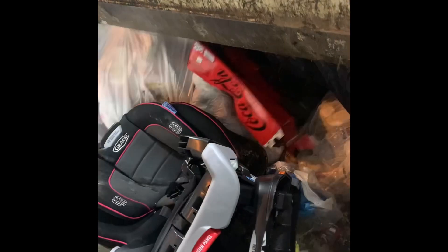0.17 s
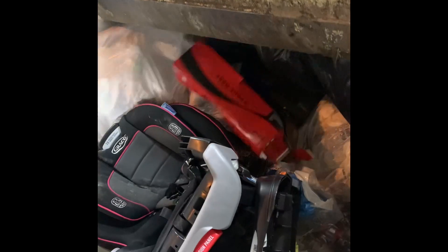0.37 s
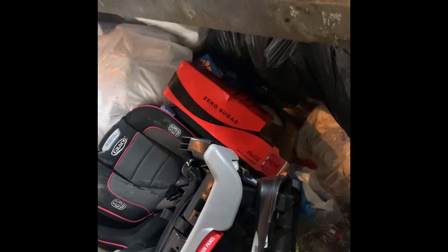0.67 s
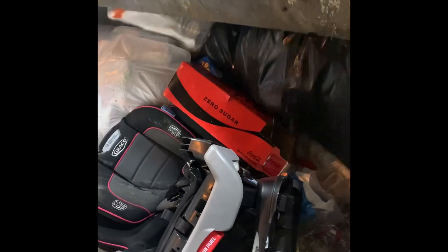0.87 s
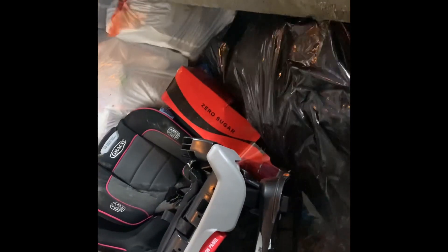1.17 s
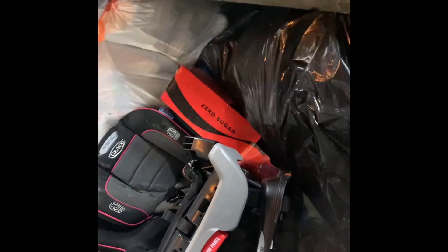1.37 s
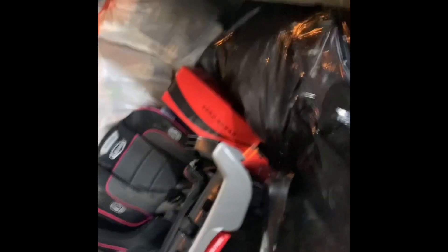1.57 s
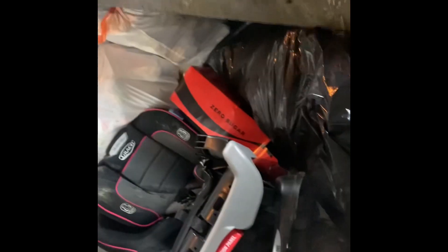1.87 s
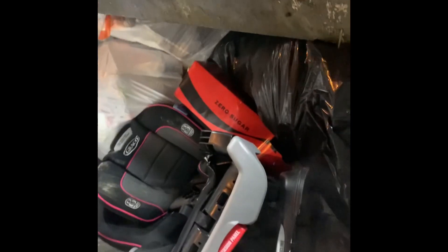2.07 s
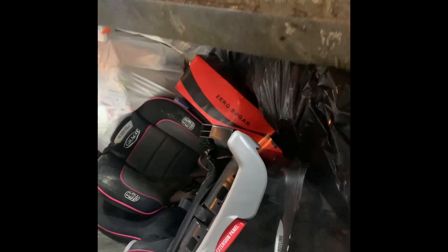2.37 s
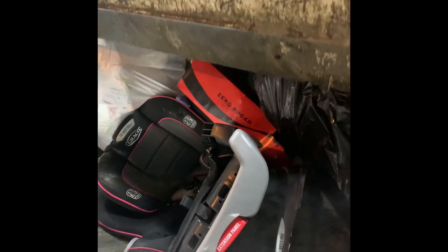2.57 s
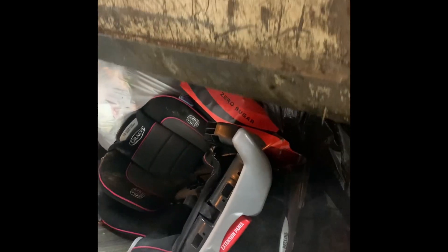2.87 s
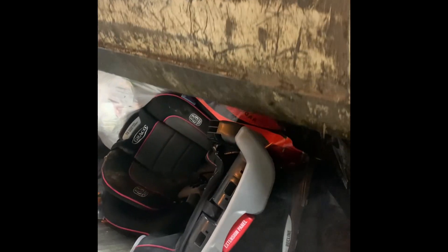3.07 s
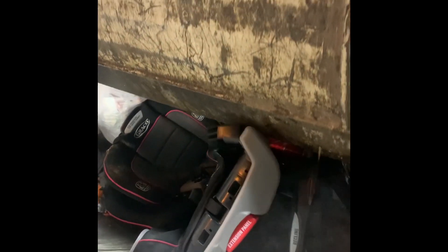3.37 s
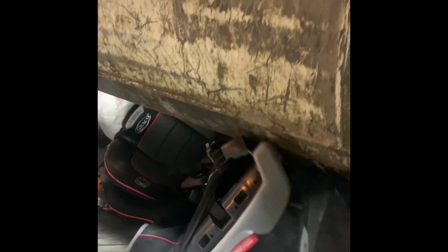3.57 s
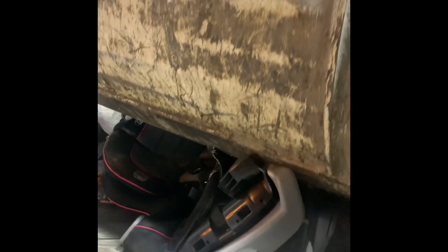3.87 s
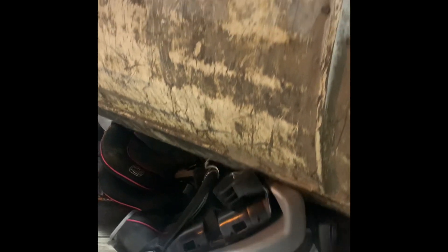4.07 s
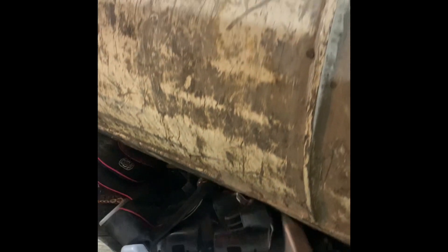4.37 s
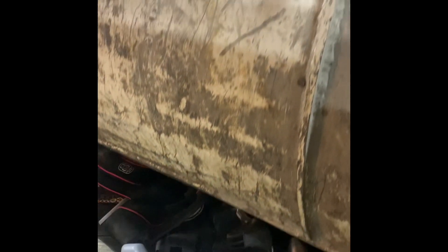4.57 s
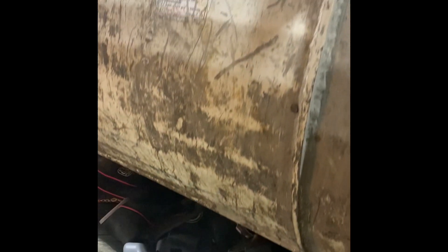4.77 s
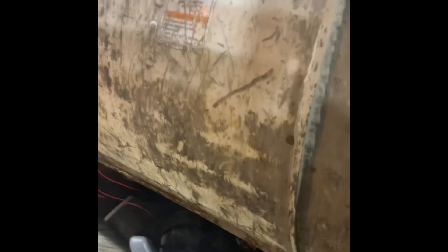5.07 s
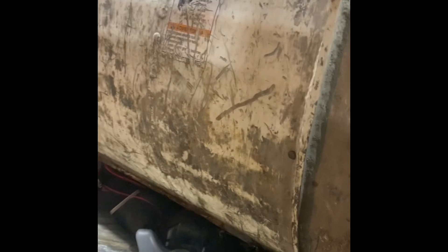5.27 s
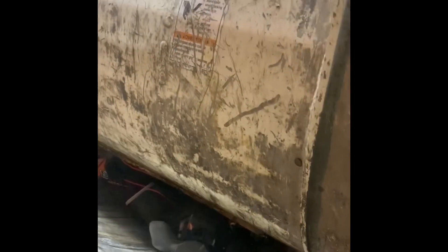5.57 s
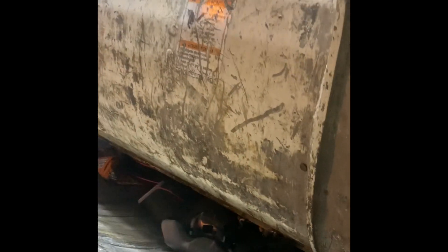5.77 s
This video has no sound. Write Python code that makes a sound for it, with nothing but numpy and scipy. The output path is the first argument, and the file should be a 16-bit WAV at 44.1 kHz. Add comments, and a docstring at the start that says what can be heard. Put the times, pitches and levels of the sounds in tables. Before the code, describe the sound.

A garbage truck's hydraulic pump hums and whines over the engine as its blade presses into the load. Plastic bags rustle and tick, then the heap slumps onto the steel floor with a boom and hollow knocks. Dragged bag plastic squeals faintly, and a hard plastic seat breaks in a run of loud, sharp cracks before the hum fades. It is heard close to the open hopper.

```python
"""A refuse truck's hydraulic blade sweeps down over bags and a moulded plastic seat, heard close by.
From the start the pump hums over the engine; the load thumps, cracks and scrapes, film rustles and ticks.
At 1.5 s the heap slumps on the steel floor with hollow knocks, and the truck body shudders.
At 2.8 s dragged film squeals. From 3.5 s the seat's plastic gives way in a run of sharp cracks,
creaking just before the snap at 5.27 s; the hum fades near the end."""
import sys
import numpy as np
from scipy import signal
from scipy.fft import rfft, irfft, next_fast_len
from scipy.io import wavfile
from scipy.ndimage import uniform_filter1d, minimum_filter1d

SR = 44100
rng = np.random.default_rng(int(sys.argv[2]) if len(sys.argv) > 2 else 0)


def store_pcm(level_fs):
    """Save levels as 16-bit WAV."""
    pcm = np.round(np.clip(level_fs, -1, 1) * 32767).astype(np.int16)
    wavfile.write(sys.argv[1], SR, np.atleast_2d(pcm).T)


N = 261072


def amp(db):
    return 10 ** (np.asarray(db, float) / 20)


def decay(t, t60_s):
    return amp(-60 * t / t60_s)


def rms_one(x):
    return x / np.sqrt(np.mean(x ** 2) + 1e-20)


def peak_one(x):
    return x / np.abs(x).max()


def add(track, start_s, sound):
    at = round(start_s * SR)
    track[at:at + len(sound)] += sound[:N - at]


def in_time(rows):
    """Columns of a curve table at every sample."""
    times_s, *columns = np.transpose(rows)
    return [np.interp(np.arange(N) / SR, times_s, column) for column in columns]


def at_hz(points, hz):
    """A spectrum read on a log-frequency axis."""
    points_hz, points_db = np.transpose(points)
    return np.interp(np.log(hz + 1), np.log(points_hz), points_db)


def drift(rate_hz):
    """Slow random wander, rms 1."""
    step = 40
    pole = np.exp(-2 * np.pi * rate_hz * step / SR)
    slow = signal.lfilter([1], [1, -2 * pole, pole * pole], rng.standard_normal(N // step + 2002))[2000:]
    return np.interp(np.arange(N) / step, np.arange(len(slow)), rms_one(slow))


def colour(x, spectrum):
    """Give a flat sound a spectrum; rms 1."""
    gain = amp(at_hz(spectrum, np.fft.rfftfreq(N, 1 / SR)))
    return rms_one(irfft(rfft(x) * gain, N))


def resonance(x, hz, width_hz):
    """Band-pass, peak gain 1."""
    r = np.exp(-np.pi * width_hz / SR)
    poles = [1, -2 * r * np.cos(2 * np.pi * hz / SR), r * r]
    return signal.lfilter((1 - r * r) / 2 * np.array([1, 0, -1]), poles, x)


def bands(x, modes, spread_db=0):
    """Resonances in parallel, signs alternating."""
    return sum((-1) ** k * amp(db + spread_db * rng.standard_normal()) * resonance(x, hz, width_hz)
               for k, (hz, width_hz, db) in enumerate(modes))


def grains(per_s, spread_db, smooth):
    """Random clicks of uneven size on a bed of smooth noise."""
    sizes = amp(spread_db * np.minimum(rng.exponential(1, N), 4)) * rng.standard_normal(N)
    clicks = sizes * (rng.random(N) < per_s / SR)
    return rms_one(clicks) + smooth * rng.standard_normal(N)


# Pump fundamental. Each row: time in seconds, piston rate in Hz, level in dB.
PUMP_HUM = [(0.0, 178.9, -22), (0.46, 178.4, -23), (0.61, 178.4, -19), (0.94, 179.7, -20),
            (1.1, 180.1, -29.5), (1.19, 180.2, -17.5), (1.53, 179.7, -8), (1.72, 179.3, -11.5),
            (1.82, 164.9, -18.5), (1.93, 166.6, -11.5), (2.18, 161.6, -9), (2.32, 161.3, -12),
            (2.48, 164.4, -10), (2.56, 163.5, -16.5), (2.67, 169.6, -10), (2.93, 179.1, -8),
            (3.08, 185.5, -14.5), (3.2, 184.5, -21.5), (3.37, 190, -23.5), (3.71, 188.4, -15),
            (3.85, 188.6, -19), (4.09, 183.3, -12.5), (4.2, 182.4, -16), (4.44, 179.5, -18.5),
            (4.55, 181.4, -25.5), (4.68, 178.8, -17), (4.81, 180, -15.5), (5.24, 177.3, -17.5),
            (5.42, 179, -23.5), (5.66, 183.3, -25.5), (5.72, 185.8, -34), (5.92, 185.8, -45)]
# Brief cancellations of the hum. Each row: centre in seconds, depth in dB, half width in seconds.
HUM_DIPS = [(1.116, -46, 0.014), (1.579, -32, 0.029), (1.662, -7, 0.012), (1.986, -30, 0.058),
            (2.589, -40, 0.05), (2.828, -19, 0.075), (3.08, -25, 0.03), (3.934, -59, 0.17),
            (5.163, -27, 0.097), (5.7, -8, 0.013)]
# Pump overtones. Each row: time in seconds, second harmonic in dB, whine in dB.
PUMP_OVERTONES = [(0, -44, -36.5), (.45, -37.5, -36), (.6, -38, -36), (.8, -37, -38.5), (1.0, -44, -37.5),
                  (1.2, -47.5, -38), (1.5, -43, -47), (1.9, -48, -46), (2.0, -38, -45), (2.08, -39, -42),
                  (2.13, -40, -45), (2.3, -28.5, -42), (2.45, -39, -44), (2.65, -36, -39.5),
                  (2.8, -52, -39), (3.0, -39, -44.5), (3.07, -45, -38.5), (3.15, -38, -43),
                  (3.4, -47, -43.5), (4.1, -39.5, -41.5), (4.3, -87, -78), (4.75, -35, -69),
                  (5.92, -49.5, -57)]
# Whine partials. Each row: multiple of the piston rate, level in dB re the whine.
WHINE_ORDERS = [(3, -4), (4, -11.5), (5, -18.5), (6, -15.5), (7, -12.5), (8, -19), (9, -14), (10, -18.5),
                (11, -21.5), (13, -25)]


def pump():
    """Piston pulses heard as a near sine with weak overtones."""
    piston_hz, hum_db = in_time(PUMP_HUM)
    second_db, whine_db = in_time(PUMP_OVERTONES)
    hum_gain = amp(hum_db + 1.02 * drift(9.4))
    for centre_s, depth_db, half_width_s in HUM_DIPS:
        away = ((np.arange(N) / SR - centre_s) / half_width_s) ** 2
        hum_gain *= np.sqrt((amp(2 * depth_db) + away) / (1 + away))
    phase = 2 * np.pi * np.cumsum(piston_hz) / SR
    whine = sum(amp(db + 1.1 * drift(24)) * np.sin(order * phase) for order, db in WHINE_ORDERS)
    second = amp(second_db + 3 * drift(14)) * np.sin(2 * phase)
    return np.sqrt(2) * (hum_gain * np.sin(phase) + second + amp(whine_db) * whine)


# Engine and truck body. Each row: time in seconds, rumble in dB, roar in dB.
ENGINE_LEVELS = [(0.0, -39, -24), (0.13, -35, -29.5), (0.45, -35, -33), (0.7, -35.5, -41.5),
                 (0.87, -34, -31.5), (1.14, -34, -33.5), (1.35, -29, -28), (1.48, -28, -32),
                 (1.92, -22, -31.5), (2.07, -33, -37), (3.0, -31, -38), (3.4, -32, -36), (3.66, -31, -41),
                 (4.05, -35, -34), (4.2, -55, -48), (4.45, -51, -74), (4.8, -40, -29), (5.13, -36, -28.5),
                 (5.3, -37, -37), (5.92, -47.5, -37)]
# Their spectra. Each row: frequency in Hz, relative density in dB.
RUMBLE_SPECTRUM = [(20, -36), (35, -4), (52, 2.5), (70, 11), (92, 9.5), (125, 8.5), (220, 5.5), (300, -60),
                   (1500, -68)]
ROAR_SPECTRUM = [(150, -4), (230, 4), (270, -1), (390, -1), (520, -3), (700, -16.5), (900, -17),
                 (1500, -11.5), (6000, -64)]


def engine():
    """Lumpy low noise through the body and a dull roar above the hum."""
    rumble_db, roar_db = in_time(ENGINE_LEVELS)
    rumble = amp(rumble_db + 2 * drift(28)) * colour(rng.standard_normal(N), RUMBLE_SPECTRUM)
    roar = amp(roar_db + 2.24 * drift(33)) * colour(rng.standard_normal(N), ROAR_SPECTRUM)
    return rumble + roar


# Load under the blade. Each row: time in seconds, scrape in dB, film rustle in dB, hiss in dB.
LOAD_LEVELS = [(0.0, -36.5, -33.5, -37), (0.35, -43, -41, -42.5), (0.7, -42.5, -40, -49.5),
               (0.86, -54, -38.5, -41), (1.25, -47, -41, -50.5), (1.5, -47, -38, -43.5),
               (1.72, -70, -39.5, -51), (2.0, -48.5, -47, -53.5), (2.58, -42, -45.5, -50),
               (2.74, -46, -48, -59), (2.784, -42, -33.5, -36), (2.87, -48, -36.5, -40),
               (3.36, -39.5, -33.5, -37), (3.43, -42, -35.5, -41.5), (3.51, -28.5, -26, -32.5),
               (3.65, -27.5, -23, -29.5), (3.82, -29.5, -25.5, -31), (3.88, -30.5, -29, -32.5),
               (4.07, -32.5, -33.5, -35.5), (4.22, -38.5, -40.5, -45.5), (4.66, -48.5, -43.5, -46.5),
               (4.81, -38, -30.5, -41), (5.0, -33.5, -40.5, -48), (5.36, -61, -48, -60),
               (5.5, -50, -45, -51.5), (5.92, -48, -43.5, -51)]
# Bags shifting. Each row: peak time in seconds, scrape, film and hiss in dB, fade constant in seconds.
BAG_SHIFTS = [(0.005, -62, -55, -31, 0.0052), (0.13, -42, -38, -41, 0.014), (0.22, -36, -35, -46, 0.022),
              (0.275, -36, -57, -40, 0.012), (0.315, -56, -58, -44, 0.0074),
              (0.424, -46, -26.5, -29.5, 0.026), (0.495, -43, -40, -45, 0.12), (0.745, -64, -48, -41, 0.11),
              (0.858, -49, -34, -37, 0.011), (1.03, -44, -45, -43, 0.1), (1.295, -41, -34.5, -38, 0.025),
              (1.425, -39, -37, -29, 0.0063), (1.534, -39, -26, -31, 0.026), (1.565, -29, -26, -50, 0.012),
              (1.602, -23, -24, -25, 0.014), (1.665, -24, -64, -74, 0.018), (1.805, -35, -52, -50, 0.025),
              (3.647, -24, -29, -39, 0.0057), (4.387, -45, -45, -42, 0.011), (4.716, -61, -52, -47, 0.024),
              (5.166, -50, -64, -61, 0.0049), (5.25, -33.5, -31.5, -35, .015),
              (5.395, -36, -70, -71, 0.029)]
# Spectra of the three layers. Each row: frequency in Hz, relative density in dB.
SCRAPE_SPECTRUM = [(500, -0.5), (900, -6.5), (1300, 0), (1800, 4), (2300, -1), (3000, -9.5), (4500, -16),
                   (12000, -63)]
FILM_SPECTRUM = [(1800, -7.5), (3000, 1), (4200, 0.5), (5200, -0.5), (6200, -0.5), (7500, -5), (8500, -12),
                 (10000, -41), (13000, -33), (17000, -58)]
HISS_SPECTRUM = [(5000, -13.5), (8000, 1.5), (10000, 12), (12000, 9), (14000, 8), (16000, -1.5)]


def sliding_load(shift_rise_s=0.015):
    """Dense grains of sliding rubbish; one unevenness shakes scrape, film and hiss together."""
    t = np.arange(N) / SR
    gains = amp(in_time(LOAD_LEVELS))
    for peak_s, *peak_db, fade_s in BAG_SHIFTS:
        envelope = np.exp(-abs(t - peak_s) / np.where(t < peak_s, shift_rise_s, fade_s))
        gains += amp(peak_db)[:, None] * envelope
    scrape_gain, film_gain, hiss_gain = gains
    uneven = drift(9.2)
    crinkle = grains(per_s=3000, spread_db=2.9, smooth=1.57)
    grit = grains(per_s=1500, spread_db=2.23, smooth=0.73)
    scrape = scrape_gain * amp(uneven) * colour(grit, SCRAPE_SPECTRUM)
    film = film_gain * amp(2.5 * uneven) * colour(crinkle, FILM_SPECTRUM)
    hiss = hiss_gain * amp(0.38 * uneven) * colour(crinkle, HISS_SPECTRUM)
    return scrape + film + hiss


def ring(push, modes, near_hz, spread_db):
    """A push rings every mode, favouring those near near_hz; each piece is slightly detuned. Peak 1."""
    out = 0
    for (hz, db, t60_s), (level_draw, tuning_draw) in zip(modes, rng.standard_normal((len(modes), 2))):
        r = decay(1 / SR, t60_s)
        angle = 2 * np.pi * hz * (1 + .02 * tuning_draw) / SR
        db += spread_db * level_draw - 11 * abs(np.log2(hz / near_hz))
        out = out + amp(db) * signal.lfilter([0, np.sin(angle)], [1, -2 * r * np.cos(angle), r * r], push)
    return peak_one(out)


# Plastic cracks and dull thumps in the load. Each row: start and length in seconds, snap peak in dB,
# tilt in dB per octave, fine treble, mid ring, low ring and floor thud in dB re the snap, pitch in Hz.
CRACKS_AND_THUMPS = [(0.06, 0.0074, -31, -3, -10, 9, 13, 20.5, 1460),
                     (0.074, 0.0038, -34, 0.1, -6, -8, 3, 19.5, 1010),
                     (0.2, 0.0032, -35, -9, -4, 13, 0, -21, 1480),
                     (0.226, 0.0095, -25.5, -4, -10, 8.5, 1, -15, 1820),
                     (0.2377, .003, -26, -6, -13, -10, 0, -21, 1620),
                     (0.409, 0.0081, -26, 9, -5, 8, 8.5, -17, 1236),
                     (0.436, 0.0049, -23, 2, -15, 7, 5, -17, 1130),
                     (0.467, 0.0034, -34, 0, -13, 10, -1, -24, 1080),
                     (0.942, .003, -48, 3, -11, -2, 24, -4, 1000),
                     (1.527, 0.0062, -17.5, -4, -12, 5.5, -7, -12, 1420),
                     (1.538, 0.01, -26.5, -4, -15, 21.5, 21.5, 5, 744),
                     (1.66, 0.017, -20, -23, -23, -7, 9, -11, 1500),
                     (3.4934, 0.003, -20, 2, -2, 2, -11, -8, 1233),
                     (3.5406, 0.0018, -6, 6, -15, -32, -19, -7.5, 1912),
                     (3.612, 0.0038, -15, -6, -4, -10, -13, -25, 2137),
                     (3.6435, 0.0063, -14, -6, 1, 3.5, 3.5, -22, 1090),
                     (3.679, 0.0018, -5, 3, -5.5, -8, -14, -12, 1350),
                     (3.758, 0.0031, -18, 18, -10, -15, 0, -7, 1502),
                     (3.7999, 0.0044, -7, 3, -4, -26, -12, -13, 2682),
                     (3.912, 0.0032, -18, 0.1, 5, -17, -24, -14, 1440),
                     (3.9832, 0.0044, -24.5, 7, 14, -18, -19, -19, 1830),
                     (4.051, 0.0024, -24, -7, -12, 4, -2, -15, 1163),
                     (4.0879, 0.0095, -12, -7, -13, -3, -27, -29, 2520),
                     (4.096, 0.0079, 7, -15, -6, -18, -26, -9.5, 2300),
                     (4.1215, 0.0018, -14.5, -2, -17, 11, 4, -28, 1685),
                     (4.138, 0.0022, 2, -4, -11, -5.5, -11.5, -37, 2140),
                     (4.2657, 0.0022, 1, -0.5, -22, -7.5, -11.5, -39, 1119),
                     (4.332, 0.004, -32, -2, -8, 13, -8, -14, 1440),
                     (4.3622, .002, -20, -5, -16, -4, -21, -24, 1603),
                     (4.3855, .007, -11.5, 0.5, -7.5, -3.5, -9, -34, 1363),
                     (4.446, 0.0037, -25, -3, -13, -19, -6, -39, 1704),
                     (4.449, 0.0058, 6.5, 0, -24, -11.5, -9, -45, 1514),
                     (4.5328, 0.0034, -27, -4, -2, 8.5, 9.5, -30, 1360),
                     (4.6689, 0.0016, -16.5, -8, -9, -15, -12, -28, 2296),
                     (4.7117, 0.0021, -16.5, -1, -21, -3, -2, -34, 1238),
                     (4.728, .0015, -31, 4, 12, -20, -10, -15, 1303),
                     (4.778, 0.0025, -18, -14, 2, -8, -7, -20, 914),
                     (4.8222, 0.0047, 2, -6, -7.5, -1.5, -0.5, -34, 1590),
                     (4.9432, 0.0021, 6.5, 0, -13, -4, -12, -42, 1155),
                     (5.0463, 0.0052, -1, -6, -6, -6.5, -5, -42, 2494),
                     (5.0642, 0.0026, -5.5, 2, -7, -7, -14, -33, 1458),
                     (5.0724, 0.0033, -3.5, -5, -7, -9, -2.5, -19, 1263),
                     (5.0854, .004, -7, -7, -15, -9, -11, -21, 1333),
                     (5.1086, 0.0034, -31, -2, -26, 12, 2, -17, 1059),
                     (5.1563, 0.0048, -14.5, -5, -13, -10.5, -25, -6, 1110),
                     (5.2723, 0.0038, -2, 4, -13, -9.5, -27, -45, 2777),
                     (5.396, 0.0037, -37.5, -5, -18, -4, 21, 21, 1467),
                     (5.4181, 0.0042, -5.5, -11.5, -5.5, -9.5, -4.5, -22, 1082),
                     (5.5643, 0.0059, -30, -6, -8, -25, 6.5, -18, 929)]
# Snap and its fine treble. Each row: centre in Hz, width in Hz, relative gain in dB.
SNAP_BANDS = [(2280, 890, -3.5), (4120, 560, 4), (5160, 3750, 6), (6140, 3140, 8), (7280, 1830, -2.5),
              (8130, 3150, -6.5)]
FINE_BANDS = [(7550, 2000, -23), (10700, 7300, 41), (13600, 2700, -24)]
# Modes of the shell and hopper floor. Each row: frequency in Hz, relative gain in dB, t60 in seconds.
SHELL_MID_MODES = [(930, -3, .03), (1100, -1, .035), (1320, -2, .025), (1550, 0, .03), (1850, -3, .02),
                   (2200, -3, .018), (2450, -3, .018), (2750, -2, .018)]
SHELL_LOW_MODES = [(325, 8.5, 0.078), (405, 11, 0.027), (448, 8.5, 0.034), (510, 11, 0.016),
                   (659, 4.5, 0.057), (760, -14, 0.019)]
FLOOR_MODES = [(60, -23, 0.039), (106, 18.5, 0.012), (214.5, 5.5, 0.13)]


def cracks_and_thumps(build_db=-18.5, build_s=0.0088, push_rise_s=0.0012, piece_db=-2, piece_cycles=24):
    """A soft creak, a bright snap, then plastic and floor ring; where the lows lead it is a dull thump."""
    out = np.zeros(N)
    t = np.arange(6000) / SR - .02  # onset at t = 0
    since_s = np.maximum(t, 0)
    build = np.where(t < 0, amp(build_db) * np.exp(np.minimum(t, 0) / build_s), 1)
    bite = 1 + (t >= 0) * amp(-29) * decay(since_s, 0.0045)  # the first instant is hardest
    swell = build * np.where(t < 0, 1, 1 - (1 - amp(build_db)) * np.exp(-since_s / push_rise_s))
    for start_s, length_s, *levels_db, piece_hz in CRACKS_AND_THUMPS:
        snap_db, tilt_db, fine_db, mid_db, low_db, thud_db = levels_db
        after_s = np.maximum(t - length_s, 0)
        tail = decay(after_s, 0.14)
        snap_noise, mid_noise, low_noise, thud_noise, size_noise = rng.standard_normal((5, len(t)))
        fragment_sizes = amp(17.5 * uniform_filter1d(size_noise, size=25))
        snap_envelope = build * bite * (decay(after_s, 0.017) + amp(-10) * tail)
        splinters = snap_noise * fragment_sizes * snap_envelope
        push = swell * (decay(after_s, 0.026) + amp(-5.5) * tail)  # drives the lows longer than the snap
        tilted = [(hz, width_hz, db + tilt_db * np.log2(hz / 4500)) for hz, width_hz, db in SNAP_BANDS]
        piece_mode = (piece_hz, piece_db, piece_cycles / piece_hz)
        snap = peak_one(bands(splinters, tilted, spread_db=1.5))
        fine = amp(fine_db) * peak_one(bands(splinters, FINE_BANDS))
        mid = amp(mid_db) * ring(mid_noise * push, SHELL_MID_MODES + [piece_mode], piece_hz, spread_db=3.5)
        low = amp(low_db) * ring(low_noise * push, SHELL_LOW_MODES, near_hz=480, spread_db=3)
        thud = amp(thud_db) * ring(thud_noise * push, FLOOR_MODES, near_hz=103, spread_db=-4)
        add(out, start_s + t[0], amp(snap_db) * (snap + fine + mid + low + thud))
    return out


def treble(x):
    return signal.sosfilt(signal.butter(1, [3000, 13000], "band", fs=SR, output="sos"), x)


# Stretched bag film. Each row: start in seconds, peak in dB.
FILM_TICKS = [(0.0877, -9.5), (0.5427, -9), (1.284, -30), (1.3922, -11.5), (1.413, -18), (1.4196, -9),
              (1.7365, -26), (1.778, -19), (1.8075, -16), (1.8095, -16), (1.813, -19), (1.842, -22.5),
              (1.8772, -17), (1.894, -30), (1.9205, -29), (1.952, -22.5), (2.0165, -19), (2.025, -24),
              (2.031, -30), (2.0514, -24), (2.071, -39), (2.083, -28.5), (2.1686, -30), (2.189, -20.5),
              (2.237, -26), (2.254, -22), (2.272, -25), (2.2897, -20), (2.322, -26), (2.353, -21),
              (2.418, -24), (2.443, -34), (2.451, -22.5), (2.486, -22), (2.5378, -25.5), (2.567, -9.5),
              (2.667, -30), (3.328, -15.5), (4.914, -15), (5.372, -30), (5.717, -24), (5.8272, -32),
              (5.875, -34)]


def film_ticks():
    """One sharp click and a very short burst each; thin film radiates only treble."""
    out, t = np.zeros(N), np.arange(1500) / SR
    click = 2.0 * (t == 0)
    envelope = decay(t, 0.007) + amp(-16.5) * decay(t, 0.058)
    for start_s, peak_db in FILM_TICKS:
        burst = (click + rng.standard_normal(len(t))) * envelope
        add(out, start_s, amp(peak_db) * peak_one(treble(burst)))
    return out


# Heap slumping on the steel floor. Each row: time in seconds, boom in dB, crunch in dB.
SLUMP_LEVELS = [(1.49, -65, -47), (1.53, -27, -12), (1.542, -15, -4.5), (1.58, -4, -6.5), (1.62, -16, -16),
                (1.65, -13.5, -21), (1.7, -16.5, -31), (1.76, -52, -30), (1.85, -60, -42.5)]
# Broad floor resonances. Each row: centre in Hz, width in Hz, relative gain in dB.
BOOM_BANDS = [(55, 19, 1.5), (83, 31, 4), (138, 108, -1.5), (177, 63, -1.5)]
CRUNCH_BANDS = [(267, 28, -4), (290, 110, -9.5), (377, 39.6, -2.5), (472, 54, -5.5), (710, 112, -13.5),
                (1223, 230, -21.5), (1800, 400, -30.5)]


def slump(shudder_peak_s=1.7, rise_db_per_s=92, fall_db_per_s=11):
    """Coarse grains drive the hopper floor in a heavy crunch, then the body shudders."""
    boom_db, crunch_db = in_time(SLUMP_LEVELS)
    lumps = grains(per_s=500, spread_db=3, smooth=1.5)
    late_s = np.arange(N) / SR - shudder_peak_s
    shudder_db = -25 + np.minimum(rise_db_per_s * late_s, -fall_db_per_s * late_s)
    shudder = amp(shudder_db) * rms_one(resonance(rng.standard_normal(N), hz=53, width_hz=5.5))
    boom = amp(boom_db) * rms_one(bands(lumps, BOOM_BANDS))
    crunch = amp(crunch_db) * rms_one(bands(lumps, CRUNCH_BANDS))
    return boom + crunch + shudder


# Knocks of shell and heap. Each row: start in seconds, pitch in Hz, peak in dB, t60 in seconds.
HOLLOW_KNOCKS = [(1.528, 383, -7, .06), (1.541, 431, -2, 0.065), (1.5405, 764, -6, .03),
                 (1.562, 730, -12, .05), (1.577, 594, -15, .04), (1.552, 140, -9.5, 0.087),
                 (1.556, 328, -14, .06), (1.576, 410, -10, 0.08), (1.581, 105, -11, 0.1),
                 (1.591, 378, -10.5, .08), (1.6, 207, -10, 0.089), (1.614, 426, -17, 0.087),
                 (1.633, 334, -13, 0.16), (1.642, 137, -3.5, 0.058), (1.65, 520, -17, .06),
                 (1.665, 319, -13, 0.11), (1.672, 167, -17, .08), (1.691, 208, -8, .06),
                 (1.726, 390, -28, 0.084), (1.765, 338, -19.5, 0.11), (3.104, 379, -22.5, 0.22),
                 (3.648, 1100, -17, .04), (4.268, 1155, -19, 0.037), (4.332, 1890, -21, .015),
                 (4.826, 1547, -6.5, 0.1), (4.947, 1158, -11, 0.11), (5.047, 428.6, -17, 0.0507),
                 (5.068, 308, -7.5, 0.033), (5.074, 402, -15, 0.05), (5.086, 395, -13, 0.073),
                 (5.163, 1113, -30, .09), (5.423, 1100, -18, 0.063), (5.419, 636, -13, 0.034),
                 (5.561, 402, -19.5, .05)]


def hollow_knocks(rise_cycles=1.3):
    """A soft blow rings one hollow resonance and a close, rough neighbour."""
    out, t = np.zeros(N), np.arange(9000) / SR
    for start_s, hz, peak_db, t60_s in HOLLOW_KNOCKS:
        phase = 2 * np.pi * hz * t
        tone = np.sin(phase) + .4 * np.sin(1.17 * phase + rng.uniform(0, 2 * np.pi))
        envelope = (1 - np.exp(-t * hz / rise_cycles)) * decay(t, t60_s)
        add(out, start_s, amp(peak_db) * peak_one(tone * envelope))
    return out


# Film dragged on steel. Each row: time in seconds, level of the rings in dB.
DRAG_LEVELS = [(2.74, -97), (2.8, -42.5), (3.1, -40), (3.45, -40.5), (3.7, -66), (3.8, -95)]
# Its rings. Each row: centre in Hz, width in Hz, relative level in dB.
DRAG_BANDS = [(1540, 240, -1), (2020, 90, -7), (3310, 130, -2), (3930, 110, -2), (4450, 200, -4),
              (5700, 200, -3), (6300, 150, -3), (7010, 200, -8)]
# Its whistle. Each row: time in seconds, pitch in Hz, level in dB.
DRAG_WHISTLE = [(2.8, 6350, -70), (2.85, 6250, -39), (2.87, 6050, -34), (2.9, 5850, -36), (2.95, 5670, -36),
                (3.03, 5660, -34), (3.08, 5670, -43), (3.13, 5690, -40), (3.24, 5720, -41),
                (3.3, 5720, -50), (3.45, 5800, -70)]


def film_squeal():
    """Broad rings of dragged film and one rough whistle that falls in pitch."""
    noise = rng.standard_normal(N)
    rings = sum(amp(db + 3 * drift(19)) * rms_one(resonance(noise, hz, width_hz))
                for hz, width_hz, db in DRAG_BANDS)
    rings_db, = in_time(DRAG_LEVELS)
    whistle_hz, whistle_db = in_time(DRAG_WHISTLE)
    whistle = (1.2 + drift(60)) * np.sin(2 * np.pi * np.cumsum(whistle_hz) / SR)
    return amp(rings_db) * rings + amp(whistle_db) * rms_one(whistle)


# Plastic slipping before it snaps. Each row: time in seconds, slips per second, level in dB.
CREAK_SLIPS = [(5.21, 200, -62), (5.24, 220, -52), (5.268, 240, -49), (5.272, 240, -80)]


def shell_creak():
    """Quickening stick-slip; each slip is a bright, dying puff of noise."""
    slips_per_s, level_db = in_time([(5.15, 200, -120)] + CREAK_SLIPS + [(5.3, 240, -120)])
    slips = np.diff(np.floor(np.cumsum(slips_per_s) / SR), prepend=0)
    puffs = signal.lfilter([1], [1, -.97], slips) * rng.standard_normal(N)
    return amp(level_db) * rms_one(treble(puffs))


def hopper_echoes(x, t60_s=0.099):
    """Short diffuse echoes off the hopper walls."""
    echoes = rng.standard_normal(2048) * decay(np.arange(2048) / SR, t60_s)
    return signal.fftconvolve(x, echoes / np.sqrt(np.sum(echoes ** 2)))[:N]


# Phase between the ports. Each row: frequency in Hz, lead of the left in radians.
PORT_LEAD = [(0, 0), (100, 0), (180, -.2), (350, -.5), (900, -.4), (1450, 0), (2000, .7), (3600, 1.9),
             (4750, 3.14), (15200, 18.85), (22050, 29.1)]
# Port balance. Each row: frequency in Hz, left minus right in dB.
PORT_BALANCE = [(120, 0), (190, .7), (240, -.5), (320, -1.5), (700, -3.2), (1200, -1), (2000, 0)]
# Diffuse share. Each row: frequency in Hz, diffuse minus direct gain in dB.
DIFFUSE_RATIO = [(30, -31), (150, -30), (300, -16), (700, -10), (1300, -10.5), (2000, -5), (2600, -1),
                 (3200, -4), (3900, -10), (4600, -15), (17000, -13)]


def microphone_ports(direct, diffuse):
    """Two ports share the direct sound with a phase lead; diffuse sound has opposite sign in each."""
    size = next_fast_len(N + 2048)
    hz = np.fft.rfftfreq(size, 1 / SR)
    lead_rad = np.interp(hz, *np.transpose(PORT_LEAD))
    to_left = np.exp(.5j * lead_rad) * amp(at_hz(PORT_BALANCE, hz) / 2)
    ratio = amp(at_hz(DIFFUSE_RATIO, hz))
    total = np.sqrt(1 + ratio ** 2)
    shared = rfft(direct, size) / total
    opposed = rfft(diffuse, size) * ratio / total
    return irfft(np.array([shared * to_left + opposed, shared / to_left - opposed]), size)[:, :N]


def gain_control(x, limit_db=-2.5, share=0.9, attack_samples=70, hold_samples=2000, recover_db_per_s=55):
    """Peaks over the limit pull the gain down; it holds, then climbs back at a steady rate."""
    peak_db = 20 * np.log10(np.abs(x).max(axis=0) + 1e-9)
    wanted_cut_db = share * np.maximum(peak_db - limit_db, 0)
    held_db = -minimum_filter1d(-wanted_cut_db, hold_samples + 1, origin=hold_samples // 2)
    climb_db = recover_db_per_s * np.arange(N) / SR
    cut_db = np.maximum.accumulate(held_db + climb_db) - climb_db
    return x * amp(-uniform_filter1d(cut_db, attack_samples + 1, origin=attack_samples // 10))


def scene():
    """Pump and impacts echo in the hopper; engine, load and squeal are drawn anew for the diffuse part."""
    echoing = pump() + cracks_and_thumps() + hollow_knocks() + film_ticks() + shell_creak() + slump()
    direct = echoing + engine() + sliding_load() + film_squeal()
    diffuse = hopper_echoes(echoing) + engine() + sliding_load() + film_squeal()
    return microphone_ports(direct, diffuse)


def record(dry):
    """Gain control, then peaks are rounded and the deepest bass and the top are cut."""
    ceiling, low_cut_hz, high_cut_hz = .82, 38, 17000
    drive = gain_control(dry) / ceiling
    rounded = ceiling * drive / (1 + drive ** 4) ** .25
    bass_cut = signal.sosfilt(signal.butter(2, low_cut_hz, "high", fs=SR, output="sos"), rounded)
    return signal.sosfilt(signal.cheby2(12, 60, high_cut_hz, fs=SR, output="sos"), bass_cut)


dry = scene()
out = record(dry)
store_pcm(out)
```